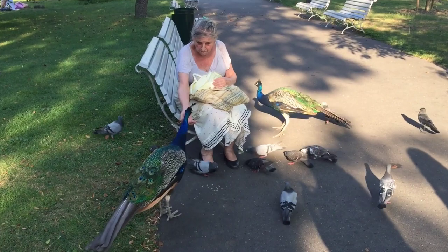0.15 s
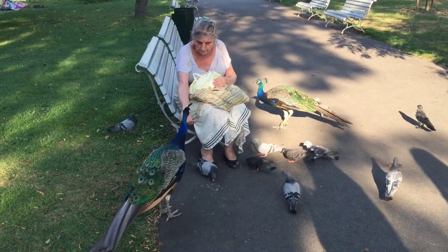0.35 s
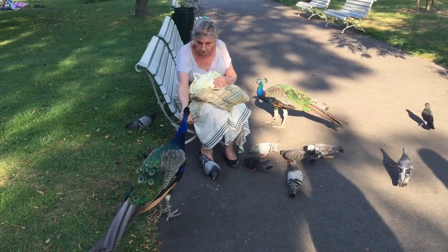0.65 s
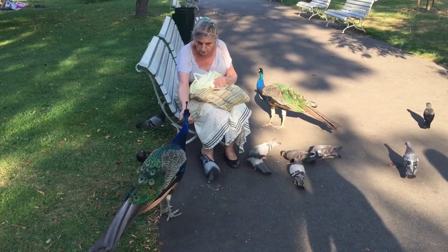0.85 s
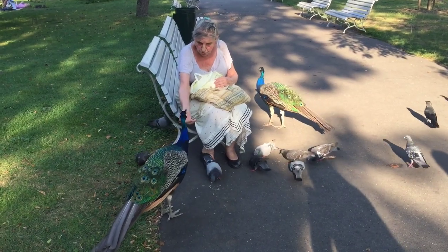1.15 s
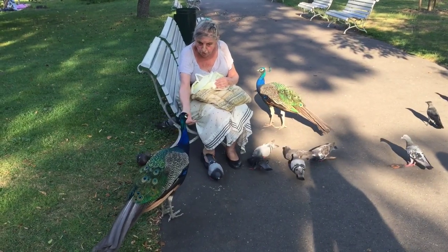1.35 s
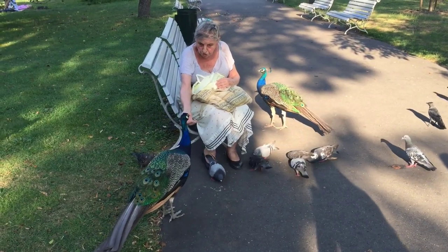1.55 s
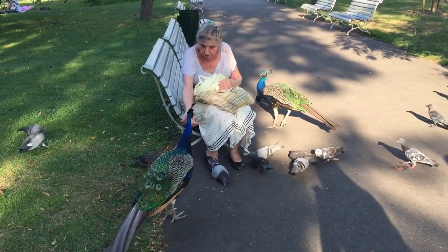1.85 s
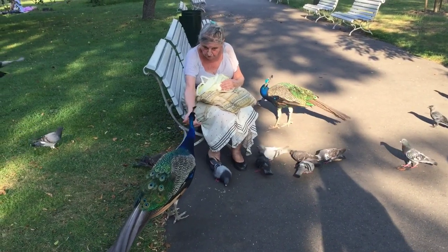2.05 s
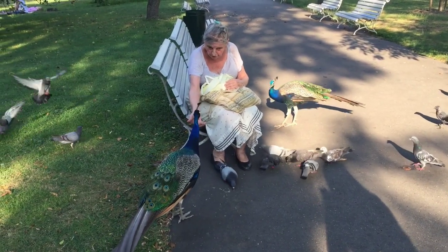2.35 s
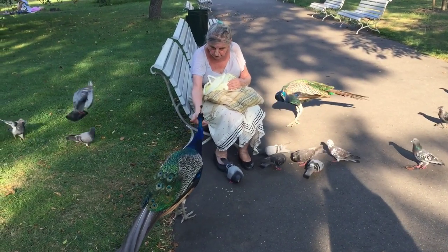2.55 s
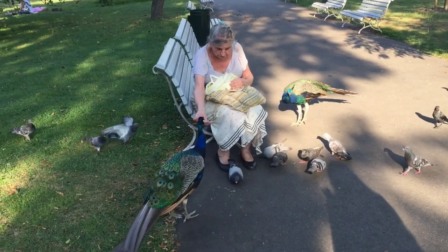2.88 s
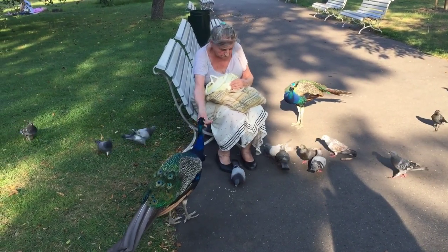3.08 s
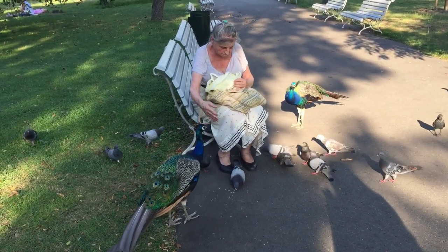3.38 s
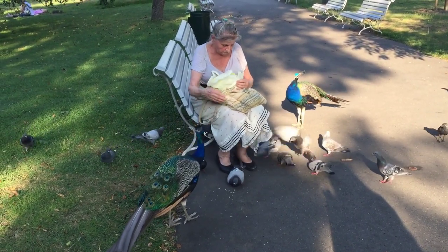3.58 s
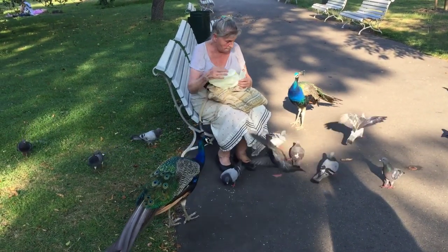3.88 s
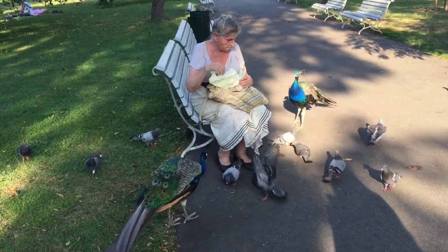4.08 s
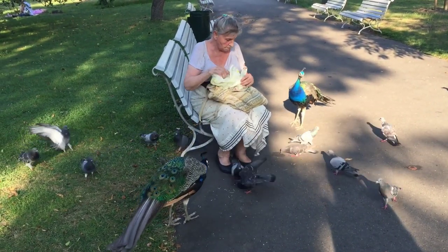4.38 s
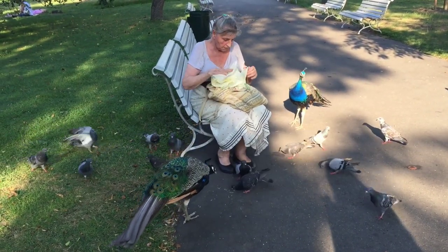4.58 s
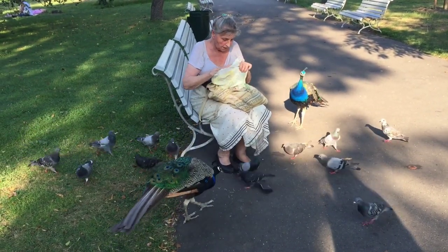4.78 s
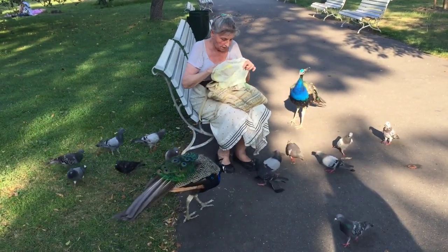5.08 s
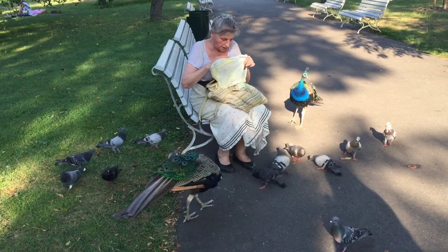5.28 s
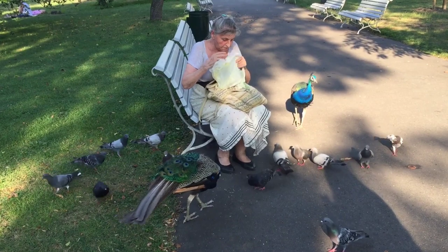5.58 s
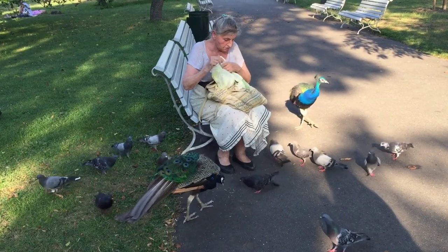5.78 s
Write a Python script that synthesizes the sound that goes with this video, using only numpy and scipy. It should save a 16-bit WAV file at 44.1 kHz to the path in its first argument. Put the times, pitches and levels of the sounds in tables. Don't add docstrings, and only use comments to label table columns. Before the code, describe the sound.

A quiet park in stereo, with a faint bed of distant traffic, patchy leaf breezes, narrow bands of far insects and slight hiss. A high cricket trills in fast pulses at about 0-0.4, 1.2-1.8, 2.5-3.2, 4.0-4.75 and from 5.5 seconds. Husky sparrow chirps dot the first four seconds, strongest near 2.0, 2.6 and 3.3. A far bird whistles at 0.6 and glides down at 1.7. Hollow frog knocks rattle at 0.7-1.1 and 1.6-1.9; soft pigeon wing puffs come around 2.5, 2.8 and 3.2. At 4.46 close wind rumble, thumps and rustling open up. From 4.6 to 5.3 a peacock gives one very loud, nasal, rapidly trembling cry, rich in overtones, rising slightly then sagging and breaking. A flickering tree echo, ticks and faint near bird notes follow until about 5.65, when the close sound cuts off, leaving the quiet park.

```python
import sys
import numpy as np
from scipy import signal
from scipy.fft import rfft, irfft, next_fast_len
from scipy.io import wavfile
from scipy.ndimage import uniform_filter1d, map_coordinates

SR = 44100
rng = np.random.default_rng(int(sys.argv[2]) if len(sys.argv) > 2 else 0)


def ratio_of_db(decibels):
    return 10 ** (np.asarray(decibels, float) / 20)


def wrap_up_sound(samples):
    columns = np.atleast_2d(samples).T
    tamed = np.clip(columns, -1, 1)
    steps = np.round(tamed * 32767).astype(np.int16)
    wavfile.write(sys.argv[1], SR, steps)


N = 261513
TIME = np.arange(N) / SR

# time in seconds, level in dB.
EFFORT = [
    (4.6105, -45.5),
    (4.634, -39),
    (4.664, -41),
    (4.706, -24),
    (4.772, -22),
    (4.995, -23),
    (5.024, -21),
    (5.247, -26.5),
    (5.276, -43),
]


def unit(x):
    return x / np.sqrt(np.mean(x ** 2) + 1e-20)


def along(points, hz):
    f, v = np.transpose(points)
    return np.interp(np.log(hz + 1), np.log(f + 1), v)


def colour_of(points):
    return lambda hz: ratio_of_db(along(points, hz))


def fade(start, end, edge):
    return np.clip(np.minimum(TIME - start, end - TIME) / edge, 0, 1)


def swell(start, rise, hold, fall):
    return np.clip(np.minimum((TIME - start) / rise, 1 + (start + rise + hold - TIME) / fall), 0, 1)


def wobble(rate):
    return map_coordinates(rng.standard_normal(2000), [TIME * np.clip(rate, .1, 300)])


def filtered(x, response):
    m = next_fast_len(N + SR // 2)
    return irfft(rfft(x, m) * response(np.fft.rfftfreq(m, 1 / SR)), m)[..., :N]


def rush(gain, alike):
    def shares(hz):
        turn = np.arccos(np.clip(along(alike, hz), -1, 1)) / 2
        return gain(hz) * [np.cos(turn), np.sin(turn)]

    mid, side = filtered(rng.standard_normal((2, N)), shares)
    return unit(np.array([mid + side, mid - side]))


def add(out, s, sound, pan_db):
    part = out[:, round(s * SR):][:, :len(sound)]
    part += ratio_of_db([[pan_db / 2], [-pan_db / 2]]) * sound[:part.shape[1]]


def scattered(x, t60, colour):
    t = np.arange(round(1.2 * SR)) / SR
    tail = rng.standard_normal((2, len(t))) * ratio_of_db(-60 * t / t60)
    tail = tail + .4 * tail[::-1]
    wet = signal.fftconvolve(x, tail / np.linalg.norm(tail[0]), axes=1)[:, :N]
    return filtered(wet, colour_of(colour))


def peacock():
    # multiple of the pitch, level in dB.
    overtones = [(1, -31), (2, 0), (3, -41), (4, -25), (5, -39), (6, -28), (7, -42), (8, -41), (9, -44),
                 (10, -31), (11, -39), (12, -47), (13, -43), (14, -40), (15, -42), (16, -45), (17, -45),
                 (18, -51), (19, -51), (20, -54), (21, -57), (22, -57), (23, -62)]
    # Hz, left over right in dB, lead of the left in radians.
    lean = np.transpose([(690, -1, -1.4), (1365, -4, 0.21), (2600, -1.5, -0.32), (4100, -0.5, 0.73),
                         (6560, -1, -1.2), (8500, -4, 0.053), (9600, 7, -1.6), (11500, 0.5, 1),
                         (12500, -8.5, 1.1), (15000, -3.5, 1.7)])
    # Hz, dB.
    mouth = [(1850, 2.5), (2050, -2), (2450, -6), (2760, 2.5), (3400, 1), (3750, 11.5), (3950, -2.5),
             (4150, 2), (4800, 0.5), (6250, -4), (6600, -10.5), (6900, 3), (12000, 2), (15200, 1.5)]
    # Hz, dB per Hz.
    breath = [(500, -30), (950, -8), (1150, 9), (1350, 6), (1600, -4), (4000, -9), (9000, -13),
              (12500, -17), (15000, -28)]
    # time in seconds, level change in dB.
    surges = [(4.625, 5.5), (4.645, 2), (4.669, 2), (4.679, -3), (4.696, 0.5), (4.708, 1), (4.72, 2),
              (4.76, 0.5), (4.79, .8), (4.914, 0.5), (4.975, 0), (5, 0), (5.068, 0.1), (5.097, -0.5),
              (5.128, 1), (5.146, 1), (5.168, 1), (5.185, 2), (5.197, -1.5), (5.236, -3.5), (5.272, 4.5)]
    start, end, full_voice_s = EFFORT[0][0], EFFORT[-1][0], EFFORT[3][0]
    on = (TIME > start) & (TIME < end)
    t = TIME[on]
    db = np.interp(t, *np.transpose(EFFORT))
    surge_db = sum(level * np.exp(-((t - s) / 0.0073) ** 2) for s, level in surges)

    def after(s):
        return np.clip(t - s, 0, None)

    top_hz, break_s = 685.3, .028
    breaking = after(end - break_s) / break_s
    hz = np.maximum(top_hz - 780 * np.minimum(t - 4.96, 0) ** 2, 605)
    hz = hz + 4.5 * np.minimum(after(5.0) / 0.021, 1) - 126 * after(5.03) - 50 * breaking

    depth = 0.1 + .022 * (-22.5 - db) + .08 * np.exp(-after(full_voice_s) / .05)
    depth = np.clip(depth + 11 * after(5.215) + 0.021 * wobble(6.9)[on], 0, .55)
    tremor_hz, hurry_beats, hurry_s = 50, 1.55, .19
    since = t - 4.608
    hurry = hurry_beats * (np.exp(-.008 / hurry_s) - np.exp(-(since + .008) / hurry_s))
    beat = 2 * np.pi * (.52 + tremor_hz * since + hurry)
    shaken_hz = hz + 13 * np.minimum(depth, .16) * np.cos(beat - 2.3) + wobble(120)[on]
    phase = 2 * np.pi * np.cumsum(shaken_hz) / SR

    tire_s = 4.99
    low_db = np.minimum(-15 - 32 * (t - start) - db, 20)
    third_db = np.clip(-52 - 120 * after(4.73) - db, -44 + 30 * after(tire_s), -21)
    bright_db = np.minimum(1.5, 0.64 * (db + 28))
    tiring_db = -32.5 * after(tire_s)
    top_db = 1.5 + 0.03 * (hz - top_hz) - 53 * after(tire_s - .05)

    breath_db = -39.0 + bright_db + 0.18 * tiring_db + 46.5 * (np.minimum(depth, .25) - 0.03)
    voice = ratio_of_db(breath_db) * rush(colour_of(breath), [(1000, 0.91)])[:, on]
    for k, level in overtones:
        side_db, lead = (np.interp(k * hz, lean[0], c) * [[.5], [-.5]] for c in lean[1:])
        tilts_db = [low_db, 0, third_db - level, bright_db + tiring_db, bright_db + 20 * after(tire_s), top_db]
        tilt_db = tilts_db[np.searchsorted([2, 3, 4, 6, 11], k, "right")]
        if k == 2:
            waver_db = .12
        else:
            waver_db = 3 if k in (1, 3, 5) or k >= 12 else 2
        level_db = level + tilt_db + along(mouth, k * hz) + waver_db * wobble(35)[on] + side_db
        if k > 2:
            level_db = level_db - 25 * breaking
        voice += ratio_of_db(level_db) * np.sin(k * phase + lead + k * k)
    out = np.zeros((2, N))
    out[:, on] = np.sqrt(2) * ratio_of_db(db + surge_db) * (1 + depth * np.cos(beat)) * voice
    return out * fade(start, end, 0.0047)


def wind(duck):
    # Hz, dB per Hz.
    wind_colour = [(15, -40.5), (25, -5.5), (102, -0.5), (162, -3.5), (248, -4.5), (292, -9), (335, 0.5),
                   (500, -16), (650, -39.5), (1100, -120)]
    gust_db = 12.5 * np.sin(np.pi * np.clip((TIME - 4.45) / 0.33, 0, 1)) ** 0.81
    level_db = -64 + gust_db - 7 * duck + 2.9 * wobble(33) + 3.1 * wobble(9)
    return ratio_of_db(level_db) * rush(colour_of(wind_colour), [(100, 0.98)])


def rustle(duck, close_start_s):
    # Hz, dB per Hz.
    rustle_colour = [(150, -29.5), (250, -3), (485, 3.5), (668, 2.5), (722, -1), (1250, 4.5), (2200, -12.5),
                     (3500, -18.5), (4550, -61), (7700, -120)]
    stir_s, stir_rise_s = 5.4, 0.045
    lull = fade(EFFORT[-2][0], stir_s + stir_rise_s, stir_rise_s)
    opening_db = 0.5 * np.exp(-np.abs(TIME - close_start_s) / 0.022)
    level_db = -49.5 - 12.5 * duck - 4 * lull + opening_db + 2.4 * wobble(40)
    return ratio_of_db(level_db) * rush(colour_of(rustle_colour), [(400, 1.0), (800, .9), (1300, 0.46)])


def tree_echo(cry, duck):
    # Hz, dB.
    trees = [(400, -10), (680, 21), (1000, 0), (1400, 0), (2000, 12), (2700, -3), (4100, 6), (9000, -10)]
    # time in seconds, dB over the echo.
    returns = [(5.287, 3), (5.334, 5), (5.363, 7), (5.377, 2.5), (5.395, 6), (5.419, -6), (5.44, 5),
               (5.451, 0), (5.476, 11), (5.491, 8.5), (5.537, 9.5), (5.548, -11), (5.557, 7), (5.567, -6),
               (5.584, 5), (5.631, 0.5)]
    echo = scattered(cry, 1.21, trees)
    held = np.sqrt(np.abs(uniform_filter1d(echo.mean(0) ** 2, size=350))) + 1e-4
    echo_db = -43 - 4 * duck - 34 * (1 - swell(EFFORT[0][0], 0.081, 2, 1))
    echo_db -= 16 * np.clip(TIME - EFFORT[-2][0], 0, None)
    echo_db += sum(db * np.exp(-((TIME - s) / 0.0076) ** 2) for s, db in returns)
    return echo / held * ratio_of_db(echo_db)


def ticks_and_thumps():
    # time in seconds, peak in dB, left over right in dB.
    ticks = [(4.4665, -58.5, -6), (4.5195, -58, -8), (4.607, -43, -9), (4.6692, -36.5, -14),
             (5.352, -51, 3), (5.442, -58, -2.5), (5.4847, -50, -6), (5.5551, -53, -4), (5.6088, -60, -3),
             (5.6472, -53, -5.5)]
    # time in seconds, peak in dB, Hz.
    thumps = [(4.491, -43.5, 120), (4.541, -40.5, 208), (4.576, -39.5, 210), (4.588, -41.5, 102),
              (4.622, -37.5, 95), (4.634, -38.5, 125), (4.666, -39, 434), (4.673, -47.5, 100),
              (5.251, -49, 110), (5.385, -47.5, 110), (5.44, -48.5, 110.5), (5.53, -53, 100),
              (5.6, -57, 90)]
    out, t = np.zeros((2, N)), np.arange(SR // 20) / SR
    click = np.sin(2 * np.pi * 2000 * t) + 0.36 * np.sin(2 * np.pi * 3300 * t)
    for s, db, pan_db in ticks:
        add(out, s, ratio_of_db(db + 12.5) * t / 0.00046 * np.exp(-t / 0.00038) * click, pan_db)
    for s, db, hz in thumps:
        add(out, s, ratio_of_db(db + 11.0) * t / 0.0045 * np.exp(-t / 0.003) * np.sin(2 * np.pi * hz * t), 0)
    return out


def close_mic(cry):
    close_span = (4.457, 5.655)
    loud_s, quiet_s = EFFORT[3][0], EFFORT[-2][0]
    step = 1 / (0.065 * SR)
    duck = signal.lfilter([step], [1, step - 1], swell(loud_s, 0.0098, quiet_s - loud_s, 0.011))
    out = wind(duck) + rustle(duck, close_span[0]) + tree_echo(cry, duck) + ticks_and_thumps()
    return out * fade(*close_span, 0.0018)


def cricket():
    # first pulse in seconds, last pulse in seconds, pulses a second.
    trills = [
        (-.2853, .36, 54.3),
        (1.1616, 1.803, 54.6),
        (2.543, 3.184, 54.65),
        (3.998, 4.75, 54.55),
        (5.522, 5.93, 54.65),
    ]
    out = np.zeros(N)
    for first, last, rate in trills:
        cold = np.exp(-(np.clip(TIME - first, 0, None) / 0.11) ** 2)
        pulses = np.clip(0.81 * np.cos(2 * np.pi * rate * (TIME - first)) + 0.57, 0, 1)
        tone = np.sin(2 * np.pi * np.cumsum(6222 - 230 * cold + 15 * wobble(60)) / SR)
        level_db = -51.0 - 5 * cold + wobble(56)
        out += ratio_of_db(level_db) * pulses * tone * fade(first - .01, last + .009, .001)
    return out * ratio_of_db([[1], [-1]]) + ratio_of_db(-24.5) * scattered(out[None], 0.19, [(100, 0.046)])


def sparrow():
    # time in seconds, peak in dB, left over right in dB.
    chirps = [(0.464, -49, -22), (0.8783, -47, -23), (1.371, -46.5, -25.5), (1.957, -39, -7),
              (2.3966, -48, -23), (2.611, -41, -15), (3.3006, -41, -14), (3.962, -53, -36)]
    out, t = np.zeros((2, N)), np.arange(round(.08 * SR)) / SR
    head = 1.2 * (t / .013) ** 3 * np.exp(3 - 3 * t / .013)
    shape = head + .3 * np.sin(np.pi * t / t[-1])
    for s, db, pan_db in chirps:
        hz = 4270 + rng.normal(0, 40) + 120 * wobble(280)[:len(t)]
        hz = hz - 70000 * np.clip(.01 - t, 0, 1) - 24000 * np.clip(t - .015, 0, 1)
        level = ratio_of_db(db - 14.5 + 0.59 * wobble(220)[:len(t)])
        add(out, s - .008, level * shape * np.sin(2 * np.pi * np.cumsum(hz) / SR), pan_db)
    return out


def whistler():
    # start in seconds, hold in seconds, from Hz, to Hz, level in dB.
    whistles = [
        (.61, .2, 2480, 2400, -59),
        (1.655, .26, 2530, 2140, -59),
        (1.75, .07, 2490, 2460, -61),
        (3.39, .18, 2360, 2420, -64.5),
    ]
    out = np.zeros((2, N))
    for s, hold, from_hz, to_hz, db in whistles:
        since = np.clip(TIME - s, 0, None)
        hz = to_hz + (from_hz - to_hz) * np.exp(-(since / .16) ** 2.1)
        tone = np.sin(2 * np.pi * np.cumsum(hz + 40 * wobble(90)) / SR) * swell(s, .018, 1, .1)
        husky = .8 + .45 * wobble(75)
        out += ratio_of_db(db - 56.5 * np.clip(since - hold, 0, None) + [[1.5], [-1.5]]) * tone * husky
    return out


def single_notes():
    # start in seconds, length in seconds, from Hz, to Hz, level in dB.
    far_notes = [(.2, .36, 2300, 2340, -70), (.49, .12, 2600, 2560, -72), (2.05, .3, 2150, 2120, -74),
                 (.015, .06, 950, 800, -61), (.03, .06, 1850, 1350, -62), (.19, .12, 7750, 7400, -66),
                 (2.27, .11, 10150, 10850, -74), (1.668, .035, 2520, 2490, -57),
                 (1.712, .03, 2480, 2450, -57), (2.47, .06, 900, 800, -63), (2.36, .1, 760, 750, -72),
                 (2.94, .07, 860, 800, -69), (3.1, .14, 850, 760, -73), (3.78, .09, 800, 850, -72),
                 (3.955, .07, 800, 780, -71), (.47, .16, 2360, 2450, -64), (3, .25, 1960, 1880, -73),
                 (3.13, .08, 3880, 3850, -69), (3.6, .3, 3980, 3930, -68), (3.95, .15, 1860, 1840, -72),
                 (1.15, .14, 4350, 4100, -66)]
    near_notes = [(4.58, .035, 4230, 4080, -51), (4.6, .09, 3850, 3800, -58), (4.61, .06, 4250, 4200, -58),
                  (4.462, .035, 1350, 1250, -50), (5.435, .04, 4350, 4300, -61),
                  (5.48, .07, 4250, 4200, -61), (5.54, .06, 4150, 4150, -61)]
    steady_notes = [(4.455, .066, 4010, 4000, -51), (4.52, .045, 4000, 3990, -57),
                    (4.562, .025, 3980, 3980, -62), (5.335, .1, 4010, 4000, -60),
                    (5.43, .12, 4000, 3990, -63), (5.4, .105, 2520, 2515, -62),
                    (5.51, .14, 2510, 2500, -66), (5.345, .05, 2050, 2040, -64),
                    (5.455, .12, 2030, 2020, -66)]
    whistle_swells = [(.625, .04, 2490, 2470, -55), (.668, .045, 2470, 2450, -55),
                      (.738, .03, 2450, 2440, -56), (.775, .03, 2430, 2420, -56),
                      (.845, .045, 2450, 2430, -56.5), (.94, .05, 2400, 2400, -63),
                      (1.785, .03, 2300, 2240, -58), (1.845, .03, 2220, 2200, -59),
                      (1.9, .03, 2470, 2470, -63), (1.965, .03, 2180, 2160, -60),
                      (2.25, .06, 2120, 2110, -66)]
    pip_times = [.055, 1.865, 2.05]
    # length in seconds, from Hz, to Hz, level in dB.
    pip = (.025, 3480, 3472, -60)
    out = np.zeros((2, N))
    pips = [(s, *pip) for s in pip_times]
    notes = [(row, .008) for row in far_notes + pips]
    notes += [(row, .003) for row in steady_notes + whistle_swells]
    notes += [(row, .02) for row in near_notes]
    for (s, length, from_hz, to_hz, db), rough in notes:
        u = np.linspace(0, 1, round(length * SR))
        shape = np.clip(np.minimum(u / 0.089, (1 - u) / 0.28), 0, 1) * ratio_of_db(2 * wobble(90)[:len(u)])
        hz = (from_hz + (to_hz - from_hz) * u) * (1 + rough * wobble(150)[:len(u)])
        hz = hz + 25 * wobble(70)[:len(u)]
        add(out, s, ratio_of_db(db + 2.0) * shape * np.sin(2 * np.pi * np.cumsum(hz) / SR), 0)
    return out


def birds():
    out = sparrow() + whistler() + single_notes()
    return out + ratio_of_db(-2) * scattered(out.mean(0)[None], .45, [(100, 0)])


def frogs():
    # time in seconds, peak in dB, Hz, left over right in dB.
    croaks = [(0.112, -77, 1320, 7), (0.175, -65.5, 1350, 3), (0.322, -62.5, 1290, 12),
              (0.503, -66, 1320, 5), (1.176, -70, 1380, 9), (1.328, -71, 1330, 12),
              (1.356, -59.5, 1412, 18.5), (2.782, -66, 764, 17), (2.905, -68, 1500, 16),
              (2.93, -69, 846, 10), (3.049, -64.5, 870, 22), (3.305, -64.5, 834, 10),
              (3.688, -67.5, 885, 18), (4.236, -68, 1247, 17)]
    # start in seconds, count, spacing in seconds, peak in dB, Hz.
    rattles = [
        (.665, 4, .042, -61.5, 1185),
        (.832, 7, .036, -64.5, 1195),
        (1.593, 8, .04, -61.7, 1235),
    ]
    out, t = np.zeros((2, N)), np.arange(SR // 20) / SR
    knocks = list(croaks)
    for s, count, spacing, db, hz in rattles:
        for k in range(count):
            knocks.append((s + k * spacing, db + rng.normal(0, 1), hz + rng.normal(0, 36), 7.5))
    for s, db, hz, pan_db in knocks:
        tone = np.sin(2 * np.pi * hz * t) + .5 * np.sin(2 * np.pi * .84 * hz * t)
        add(out, s, ratio_of_db(db + 9.5) * t / 0.004 * np.exp(-t / 0.0051) * tone, pan_db)
    return out


def pigeons():
    # time in seconds, peak in dB, left over right in dB.
    flaps = [(0.019, -55, -10), (1.594, -60.5, 22), (2.479, -46, 2.5), (2.52, -57.5, 0), (2.782, -51, 6.5),
             (3.22, -51.5, 6.5), (3.27, -55.5, -3.5), (4.235, -59, 6)]
    out, t = np.zeros((2, N)), np.arange(SR // 8) / SR
    for s, db, pan_db in flaps:
        puff = t / 0.017 * np.exp(1 - t / 0.018) * rng.standard_normal(len(t))
        add(out, s, ratio_of_db(db) * puff, pan_db)
    return filtered(out, colour_of([(300, -34.0), (800, -0.5), (2500, -4.0), (5000, -5.0), (9000, -45.5)]))


def choirs():
    # Hz, width in Hz, level in dB, swells a second, swell in dB.
    insect_bands = [(6972, 280, -60.5, 26, 1), (5474, 410, -63.5, 61, 0.5), (4696, 120, -68, 22, 3.5),
                    (4180, 160, -71.5, 24, 5), (3330, 170, -79, 21, 4.5), (1906, 180, -76.5, 6.2, 6.5)]
    out = np.zeros((2, N))
    for centre_hz, width, db, rate, swell_db in insect_bands:
        band = rush(lambda f: 1 / (1 + ((f - centre_hz) / width * 2) ** 2), [(100, 0.061)])
        out += ratio_of_db(db + swell_db * wobble(rate)) * band
    return out


def patchy(x, depth_db):
    z = signal.stft(x, nperseg=512)[2]
    field = uniform_filter1d(rng.standard_normal(z.shape[1:]), size=2, axis=0)
    field = uniform_filter1d(field, size=20, axis=1)
    return unit(signal.istft(z * ratio_of_db(depth_db * unit(field)), nperseg=512)[1][:, :N])


def park():
    # Hz, dB per Hz.
    far_colour = [(24, -69.5), (40, -26.5), (251, -29), (761, -10), (1170, -9), (2160, -11.5), (3720, -11),
                  (4660, -7.5), (4990, -14), (5470, -2), (6410, -8), (7010, -2), (7680, -22), (9000, -28),
                  (11700, -65.5), (19800, -120)]
    leaf_colour = [(4290, -38), (7300, -11.5), (7860, -6), (9600, -12.5), (12500, -59.5), (21100, -120)]
    # Hz, likeness from -1 to 1.
    likeness = [(60, 0.15), (180, -0.34), (540, -0.39), (1630, -0.3), (4910, -0.27), (14800, -0.28)]
    # Hz, left over right in dB.
    sides = [(60, 3.5), (180, -2.5), (540, 1), (1630, 1.5), (4910, -0.5), (14800, 4)]
    # start, rise, hold and fall, all in seconds.
    breezes = [
        (-.1, .05, .39, .03),
        (.72, .22, .58, .2),
        (2.04, .04, 1.2, .75),
        (3.95, .12, 2, .1),
    ]
    breeze = np.max([swell(*row) for row in breezes], 0)
    far = ratio_of_db(-53 + 0.16 * wobble(1.8)) * patchy(rush(colour_of(far_colour), likeness), depth_db=3.0)
    leaves = patchy(rush(colour_of(leaf_colour), [(100, 0.33)]), depth_db=5.0)
    leaves = ratio_of_db(-73 - 15.5 * (1 - breeze)) * leaves
    return filtered(far + leaves, lambda hz: ratio_of_db(along(sides, hz) * [[.5], [-.5]]))


def microphone_hiss():
    # Hz, dB per Hz.
    hiss_colour = [(8000, -26.5), (9500, -4), (11000, 4), (12900, -2), (13250, -17.5), (15000, -30.5)]
    return ratio_of_db(-74.0 + .8 * wobble(16)) * rush(colour_of(hiss_colour), [(100, 0.066)])


def scene():
    cry = peacock()
    near = cry + close_mic(cry) + cricket()
    return near + birds() + frogs() + pigeons() + choirs() + park() + microphone_hiss()


def thinned(x):
    # Hz, dB over its usual level.
    hush = [(6500, -17), (7800, -3.5), (8800, -2), (9800, 0.5), (12000, 0), (14000, 0)]
    # Hz, dB over its band.
    sparse = [(8600, -30), (9600, -1), (11000, 2), (15000, 3)]
    hz, _, z = signal.stft(x, SR, nperseg=2048, noverlap=1536)
    power = np.abs(z) ** 2
    held = uniform_filter1d(power.mean(0), size=2, axis=1)
    bands = held[1:].reshape(-1, 16, z.shape[2]).mean(1)
    bands = np.repeat(bands, 16, axis=0)
    level_db = 10 * np.log10(np.abs(np.vstack([bands[:1], bands])) + 1e-20)
    usual_db = np.median(level_db, 1, keepdims=True)
    loud_db = 10 * np.log10(power.sum((0, 1)) + 1e-20)
    masking_db = 0.65 * np.clip(loud_db - np.median(loud_db) - 20.0, 0, None) * (hz[:, None] > 7500)
    need_db = usual_db + along(hush, hz)[:, None] + masking_db
    lively_db = np.clip(level_db - usual_db - 5, 0, None)
    line_db = 10 * np.log10(np.abs(held) + 1e-20)
    strong = line_db > level_db + along(sparse, hz)[:, None] - lively_db
    kept = z * strong * np.clip(2 * (level_db - need_db) + .5, 0, 1)
    return signal.istft(kept, SR, nperseg=2048, noverlap=1536)[1][:, :N]


def band_limit(x):
    return signal.sosfilt(signal.butter(12, 15360, fs=SR, output="sos"), x)


def record(dry):
    mix = thinned(dry)
    return band_limit(mix)


dry = scene()
out = record(dry)
wrap_up_sound(out)
```